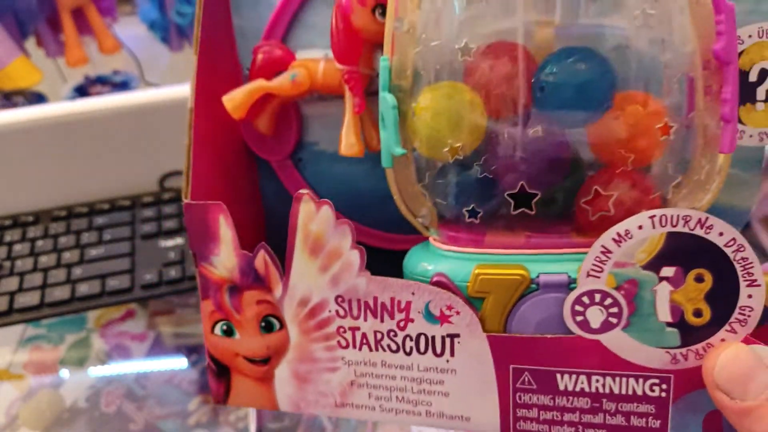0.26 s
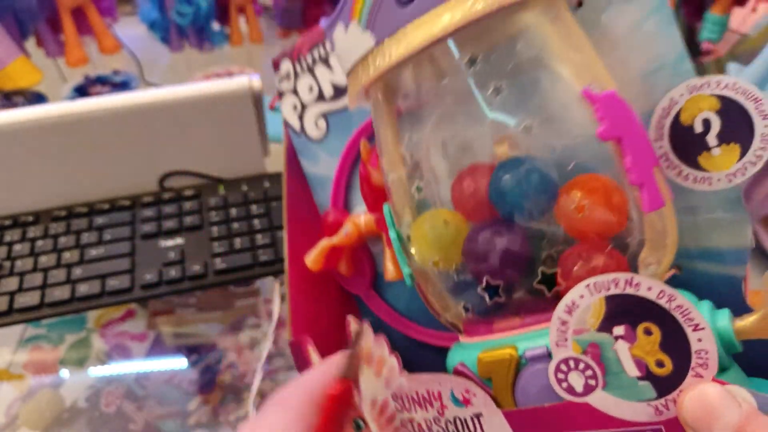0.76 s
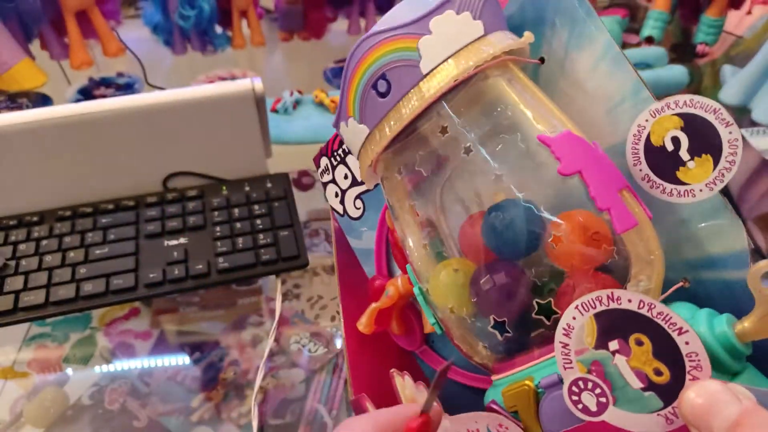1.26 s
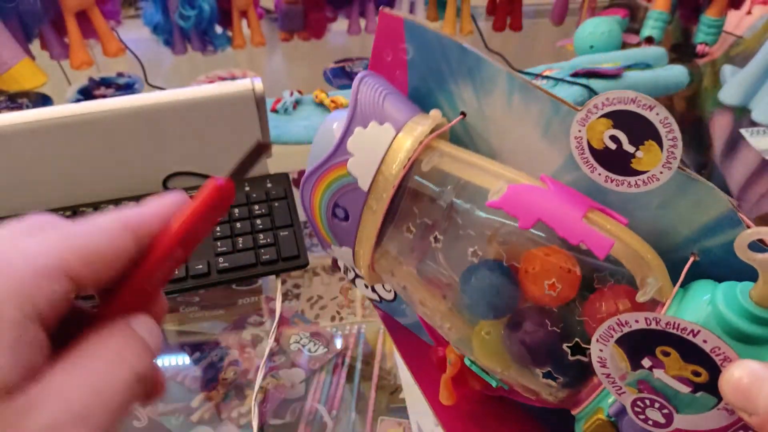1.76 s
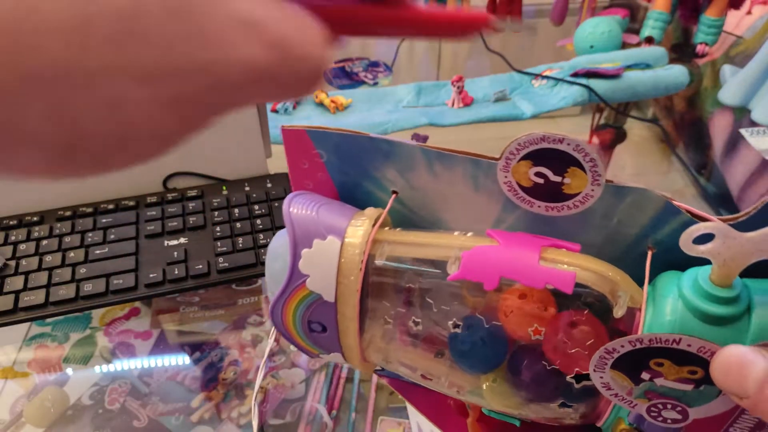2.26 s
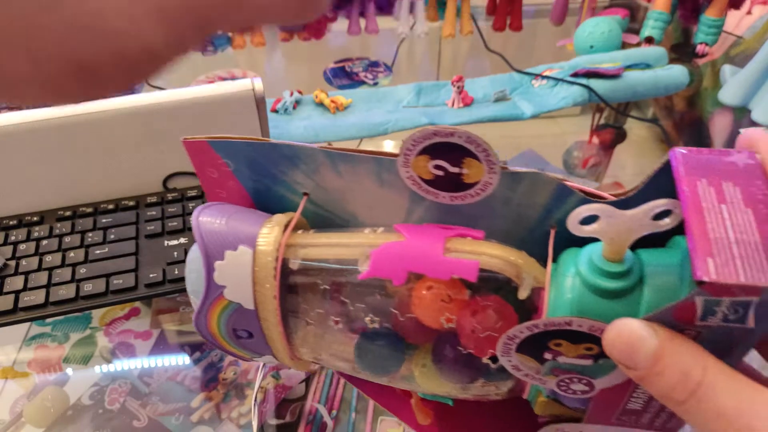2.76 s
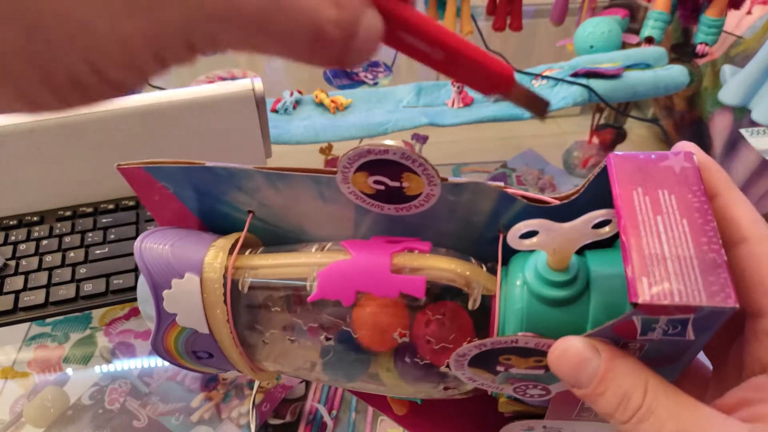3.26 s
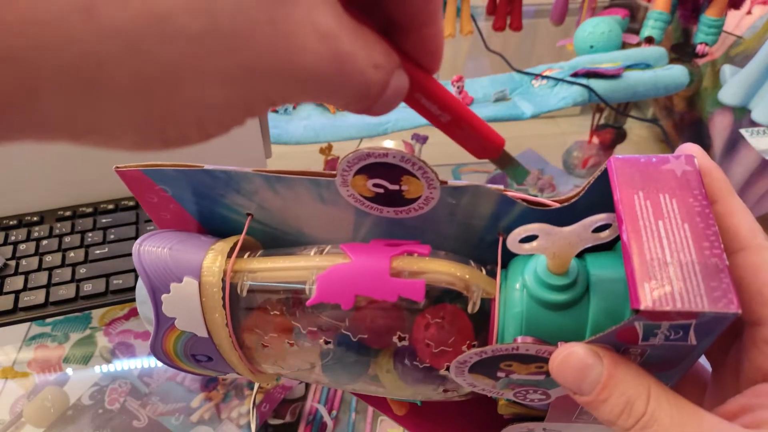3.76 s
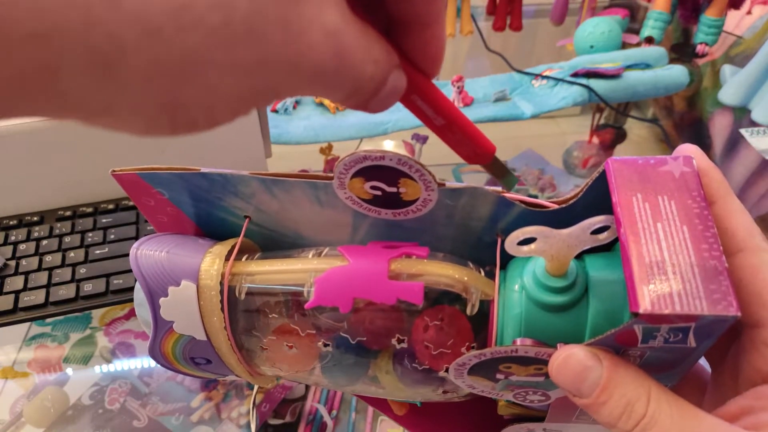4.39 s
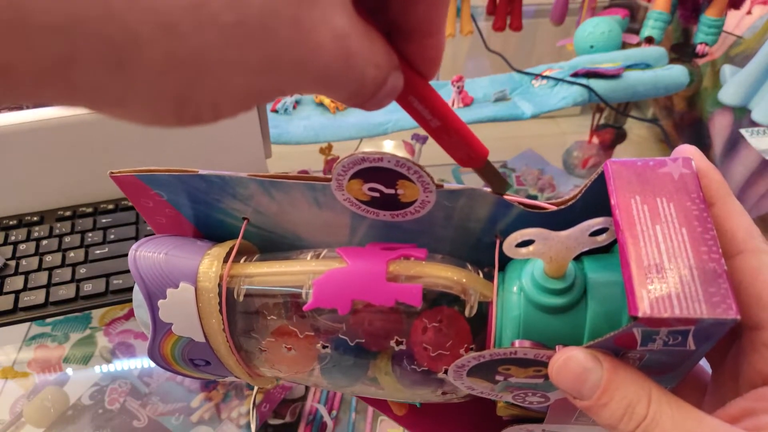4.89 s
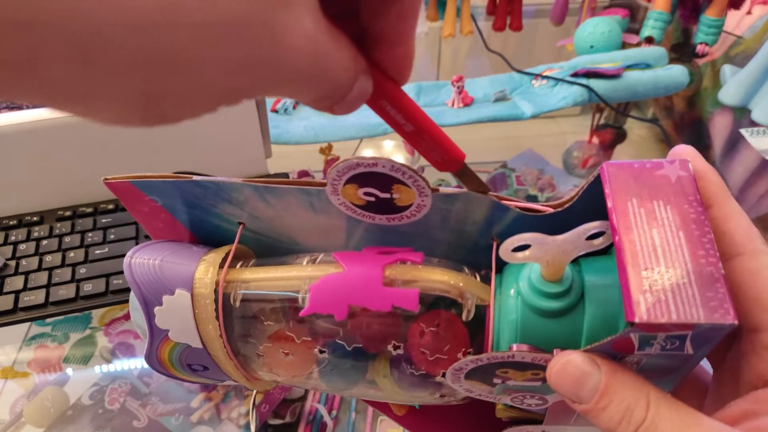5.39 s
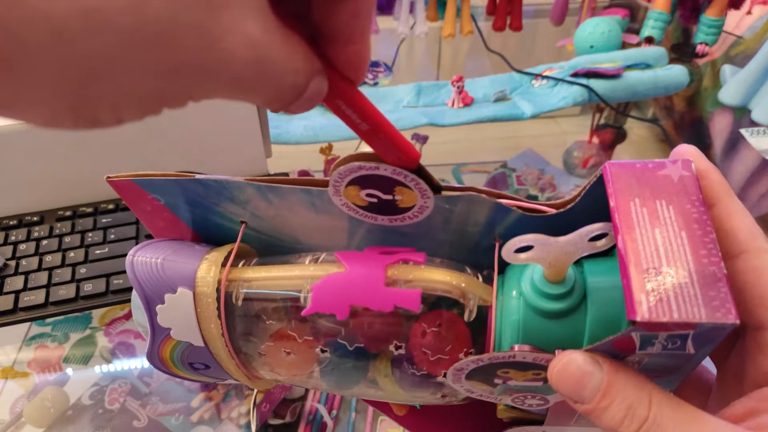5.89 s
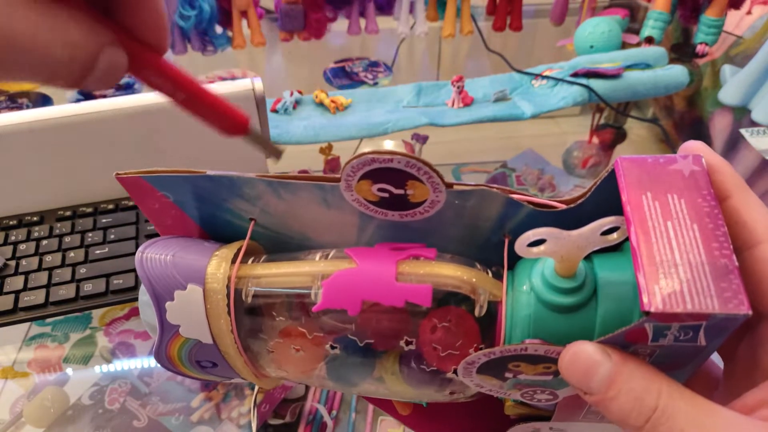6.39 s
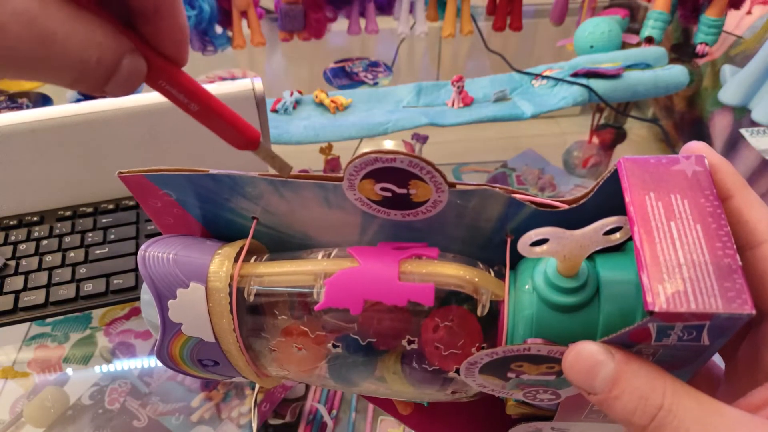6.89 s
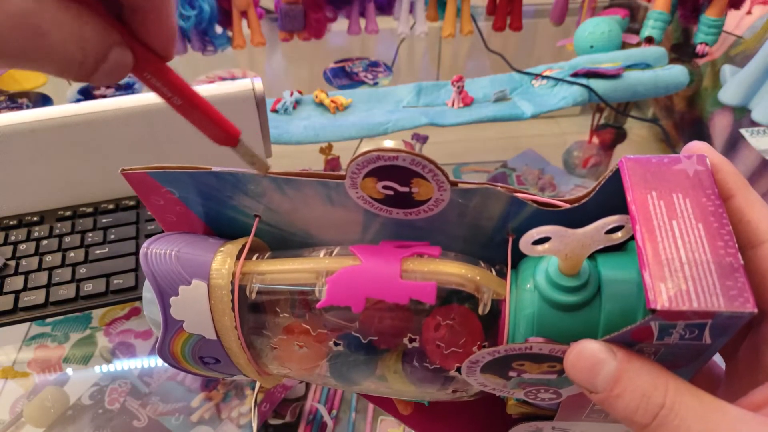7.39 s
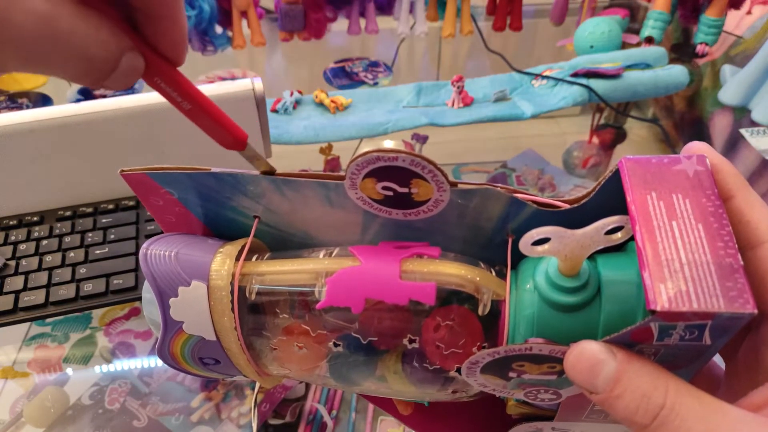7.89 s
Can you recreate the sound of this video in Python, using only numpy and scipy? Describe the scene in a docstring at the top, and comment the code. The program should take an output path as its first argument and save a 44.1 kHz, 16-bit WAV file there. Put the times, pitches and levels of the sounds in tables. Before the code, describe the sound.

A close stereo microphone in a small room hears a boxed plastic toy lantern being handled over soft room air, hand rumble and a faint wavering low hum. At first it is quiet, with a soft bump near 0.4 s and a small click at 0.5. Card bumps dully at 1.1, then hollow balls roll and knock around 1.45-1.65. A sharper card clack and thud come at 2.0, with fingers rubbing the packaging. Balls tumble again from 2.2 to 2.85, with the hardest knock near 2.57, and rattle brightly from 3.4 to 4.0 before settling. Then mostly quiet: faint blade scrapes around 4 s, a short rasp and click at 4.9-5.0, scraping into a strong crisp snap at 5.6. Another snap lands at 6.05, followed by light rubbing, tiny ticks and short scrapes at 7.1 and 7.4, and a bright snap at 7.95 as the hum returns.

```python
"""A boxed plastic toy lantern is turned over in the hands, heard close up in a small room.
Hollow balls roll and knock inside: noise bursts and random slips ring through a plastic wall.
The packaging creaks and bumps: short card bursts, sliding noise and decaying low sines.
Then a craft knife scrapes at the taped cardboard edge (rough slips) and snaps through it.
Room air, hand rumble, a wavering hum and faint drones lie underneath."""
import sys
import numpy as np
from scipy import signal
from scipy.fft import rfft, irfft
from scipy.io import wavfile
from scipy.ndimage import uniform_filter1d

SR = 44100
rng = np.random.default_rng(int(sys.argv[2]) if len(sys.argv) > 2 else 0)


def generate_wav(signal):
    """Clip the signal to [-1, 1] and save it as 16-bit WAV at the path in sys.argv[1]."""
    frames = np.transpose(np.atleast_2d(signal))
    scaled = np.clip(frames, -1, 1) * 32767
    pcm = np.round(scaled).astype(np.int16)
    wavfile.write(sys.argv[1], SR, pcm)


N = 359360

# balls hitting the lantern: start_s, strength_db, brightness_db, cavity_boom_db, struck_spot_hz
KNOCKS = [(.382, -72, -10, 11, 1300), (.604, -59, -10, 3, 3240), (.890, -66, -9, 9, 960),
          (1.417, -57, -12, 0, 2810), (1.4476, -37.5, -8, -6, 1350), (1.5345, -33.5, -7, -4, 1720),
          (1.558, -44, -7, 5, 960), (1.585, -40.5, -10, 5, 1080), (1.601, -49, -4, 1, 960),
          (1.657, -55, -9, 4, 1160), (2.172, -40.5, -3, -2, 1320), (2.278, -59, -3, 11, 960),
          (2.256, -62, -3, 7, 2700), (2.294, -55, -5, -2, 2900), (2.321, -50, -11, -2, 2860),
          (2.384, -54, -1, 5, 2700), (2.435, -47.5, -6, 7, 1150), (2.476, -55, -7, 0, 2700),
          (2.512, -49, -6, 8, 1480), (2.541, -46, -9, 3, 2370), (2.555, -35, -1, -4, 2470),
          (2.5721, -22, 1, -2, 1970), (2.6322, -29.5, 1.5, 0, 2910), (2.654, -45, -6, -4, 3090),
          (2.714, -40.5, 1, 3, 2220), (2.742, -42, -4, -2, 1940), (2.793, -40.5, -4, 1, 1360),
          (2.832, -48, -3, -8, 1540), (3.319, -60, -8, 0, 1350), (3.3755, -31, 0, 5, 3950),
          (3.428, -52, -2, 1, 1990), (3.468, -52, -2, 0, 1040), (3.4835, -40.5, -1, -3, 2110),
          (3.563, -48, -4, 5, 1390), (3.595, -47, -2, 4, 3340), (3.628, -48, -2, 5, 2990),
          (3.649, -41.5, -1, 0, 2950), (3.6745, -31.5, 2, 5, 1030), (3.721, -29.5, 0, -10, 1360),
          (3.730, -35, 4, -2, 3930), (3.756, -45, 1, 3, 3370), (3.815, -45.5, -2, 2, 2330),
          (3.834, -51, -3, -5, 3010), (3.877, -52, -4, -2, 2140), (3.930, -43, 2, -3, 2400),
          (3.964, -53, -5, 1, 2250), (4.043, -42.5, -6, -1, 2210), (4.106, -59, -4, -1, 2210),
          (4.139, -61, -3, -1, 2210)]
# tilts of the box that set the balls rolling: crest_s, rise_s, fall_s, level_db
ROLLS = [(1.53, .3, .24, -60), (2.6, .56, .4, -54.5), (3.66, .36, .35, -51.5)]
# thud, hollow, clack, tick; low bending waves arrive later and last longer: low_hz, high_hz, delay_s,
# added_contact_s (before halving), after_ring_share, after_ring_s, pan_share, left_right_likeness (-1 to 1),
# trim_db (contacts only)
REGISTERS = [(150, 420, .0008, .003, .07, .022, 0, .9, -.3),
             (420, 1150, .0014, .0018, .14, .007, .05, .92, 0),
             (1150, 4500, -.0002, .0006, .13, .0055, .4, .72, 0),
             (4500, 17000, -.0002, .0002, .11, .0026, .95, .7, .3)]
# broad colour of the knocks: pitch_hz, level_db; little is heard above about 10 kHz
KNOCK_COLOUR = [(130, -12), (245, 3), (300, 2), (410, -5), (700, -1), (900, -1.5), (1250, -4), (1600, -1),
                (2100, -1.5), (2600, -5), (3150, -3), (3650, -7), (4700, -7), (7400, -2), (9000, -4),
                (10100, -22), (12500, -29), (15500, -27)]
# resonances of the cardboard: pitch_hz, width_hz, rise_above_colour_db
CARD_PEAKS = [(285, 60, 3), (510, 50, 6), (625, 70, 7), (815, 50, 3), (2350, 90, 4), (3000, 140, 4),
              (6450, 90, 5), (6870, 90, 5), (7233, 90, 5), (7630, 130, 5)]

SIZE = 4096  # samples in a response or contact
HZ = np.fft.rfftfreq(SIZE, 1 / SR)
TIME = np.arange(N) / SR
HUM_ATTACK_S, HUM_RELEASE_S = .1, .45
SOFT_DB = -45  # strength of a soft knock
SWELL_DB = 16  # a roll or rub is this far below its crest one rise before it and one fall after it


def gain_of(db):
    """Turns decibels into an amplitude factor."""
    return 10 ** (np.asarray(db) / 20)


def evened(x):
    """Scales a sound to a mean power of 1."""
    return x / np.sqrt(np.mean(x ** 2) + 1e-30)


def read(points, hz):
    """Joins the points of a curve by straight lines on a log-frequency axis."""
    f, value = np.transpose(points)
    return np.interp(np.log(hz + 1), np.log(f + 1), value)


def level(curve):
    """Turns a dB curve over time into a gain for every sample."""
    return gain_of(np.interp(TIME, *np.transpose(curve)))


def add(mix, s, sound):
    """Lays a sound into the mix at time s, cut at the end."""
    part = mix[:, max(round(s * SR), 0):][:, :sound.shape[1]]
    part += sound[:, :part.shape[1]]


def panned(pair, db):
    """Gives a stereo pair its left-right balance and a mean power of 1."""
    balance = gain_of([[db / 2], [-db / 2]])
    return evened(pair / pair.std(1, keepdims=True) * balance)


def noise_pair(count, likeness):
    """White noise at two ports that are partly alike."""
    a, b = rng.standard_normal((2, count))
    c = np.clip(likeness, -1, 1)
    return np.array([a, c * a + np.sqrt(1 - c * c) * b])


def wander(top_hz):
    """Slow random drift of unit power, holding only rates below top_hz."""
    slow = np.fft.rfftfreq(N, 1 / SR) < top_hz
    return evened(irfft(rfft(rng.standard_normal(N)) * slow, N))


def wash(spectrum):
    """Coloured noise, alike at both ports in the bass and diffuse in the treble."""
    hz = np.fft.rfftfreq(N, 1 / SR)
    alike = np.clip(read([(300, .84), (1500, .65), (5000, .3)], hz), 0, 1)
    a, b = rfft(rng.standard_normal((2, N)))
    pair = np.array([a, alike * a + np.sqrt(1 - alike ** 2) * b])
    return evened(irfft(pair * gain_of(read(spectrum, hz)), N))


def swell(t, crest, rise, fall, db):
    """The gain of a movement that gathers speed up to its crest and slows again."""
    distance = (t - crest) / np.where(t < crest, rise, fall)
    return gain_of(db - SWELL_DB * np.minimum(distance ** 2, 10))


def voiced(voice, strength_db, bright_db):
    """The dB in each register: brightness weighs on each by its own share."""
    return [strength_db + db + share * bright_db for db, share in voice]


def responses(colour, peaks):
    """The causal (minimum-phase) impulse response of a colour with resonances, in each register."""
    db = read(colour, HZ)
    db = db + sum(rise / (1 + ((HZ - f) / (width / 2)) ** 2) for f, width, rise in peaks)
    out = []
    for lo, hi, *_ in REGISTERS:
        band = 1 / np.sqrt((1 + (lo / (HZ + 1)) ** 10) * (1 + (HZ / hi) ** 10))
        log_gain = np.log(gain_of(db) * band + 1e-4)
        circle = np.concatenate([log_gain, log_gain[-2:0:-1]])
        out.append(np.fft.ifft(np.exp(np.conj(signal.hilbert(circle)))).real)
    return out


def hits(table, body, spot_db, spot_width_hz, echo, echo_s, detune, chatter, chatter_s=.004,
         lag_s_per_db=.000015, soft_share=.035, smoothing=.7):
    """Each contact is a brief rough burst that spreads through the body, register by register."""
    out, t = np.zeros((2, N)), np.arange(SIZE) / SR
    bounce = 1 + echo * np.exp(-2j * np.pi * HZ * echo_s)  # off the nearest flap
    to_ten_ms = np.sqrt(.01 * SR / SIZE)  # strength counts as if the power were spread over 10 ms
    lead = .008  # s of soft noise ahead of the hit
    age = np.maximum(t - lead, 0)
    # a faint soft noise swells just before each hit and fades after it
    soft_noise = soft_share * np.exp(-abs(t - lead) / .0022)
    for s, contact, spot_hz, *levels, pan in table:
        # the nearer port hears it first
        lag = np.exp(2j * np.pi * HZ * np.array([[pan / 2], [-pan / 2]]) * lag_s_per_db)
        stretch = 1 + detune * rng.uniform(-1, 1)  # each spot is a little stiffer or softer
        # and has a short ring of its own
        spot = gain_of(spot_db / (1 + ((HZ - spot_hz) / (spot_width_hz / 2)) ** 2))
        # the surfaces touch a second time
        again_s, again = rng.uniform(.5, 1.5) * chatter_s, chatter * rng.random()
        for response, db, register in zip(body, levels, REGISTERS):
            _, _, delay, longer, ring, ring_s, share, alike, trim_db = register
            push_s = max(.5 * (contact + longer), 1e-4)
            u, v = age / push_s, np.maximum(age - again_s, 0) / push_s
            pushes = u ** 1.5 * np.exp(-u) + again * v ** 1.5 * np.exp(-v)
            # after the contact, waves go on crossing the wall
            envelope = soft_noise + pushes + ring * (1 - np.exp(-u)) * np.exp(-age / ring_s)
            wall = np.interp(HZ * stretch, HZ, rfft(response))
            burst = rfft(noise_pair(SIZE, alike) * envelope)
            # a sharp contact excites all pitches about evenly, so the noise's lumps are flattened
            power = np.mean(abs(burst) ** 2, 0)
            lumps = np.sqrt(abs(uniform_filter1d(power, size=50)))
            sound = irfft(burst / lumps ** smoothing * wall * spot * bounce * lag)
            gain = gain_of(db + trim_db) * to_ten_ms
            add(out, s + delay - lead, gain * panned(sound, pan * share))
    return out


def friction(count, response, per_s, spread_db, hiss, slip_s):
    """Short rough slips of uneven size over a smooth hiss, sounding through a body."""
    sizes = gain_of(spread_db * np.minimum(rng.exponential(1, count), 4))
    slips = (rng.random(count) < per_s / SR) * sizes
    u = np.arange(SIZE) / SR / slip_s
    slips = signal.oaconvolve(slips, u * np.exp(-u))[:count]
    drive = noise_pair(count, .7) * (evened(slips) + hiss)
    return evened(signal.oaconvolve(drive, response[None], axes=1)[:, :count])


def background(waver=.35, slip=.6):
    """Steady room air, the rumble of the hands and a wavering low hum that comes and goes."""
    # steady room air: pitch_hz, relative_level_per_hz_db
    air = [(20, -4), (62, 1), (88, -10), (125, -8), (152, -2), (185, -6), (300, -6), (450, -13.5),
           (700, -19.5), (1200, -26), (2500, -32), (5000, -36.5), (7600, -32.5), (9000, -35), (10300, -46),
           (13000, -49), (16000, -61)]
    # rumble of the moving hands: pitch_hz, relative_level_per_hz_db
    grip = [(20, -13), (43, -5), (65, -12), (100, -24), (165, -19), (225, -17), (275, -15), (450, -32),
            (1500, -70)]
    # the hands rumble while they turn the box, settle for the cut and shift again: time_s, level_db
    grip_level = [(0, -62), (2.6, -61.5), (4.1, -66), (4.6, -72), (7.8, -76), (8.15, -64)]
    # spells of the hum: start_s, end_s
    hum_spells = [(1.1, 2.35), (7.93, 8.15)]
    air_db, hum_hz, hum_db, hum_rest_db = -62.8, 62, -61, -78
    phase = 2 * np.pi * hum_hz * TIME + slip * wander(6)
    hum = evened((1 + waver * wander(8)) * np.sin(phase))
    on = 0
    for start, end in hum_spells:
        attack = np.clip((TIME - start) / HUM_ATTACK_S + 1, 0, 1)
        on = on + attack * np.exp(-np.maximum(TIME - end, 0) / HUM_RELEASE_S)
    hum = hum * np.maximum(gain_of(hum_db) * on, gain_of(hum_rest_db))
    return gain_of(air_db) * wash(air) + wash(grip) * level(grip_level) + hum


def drones():
    """Faint steady sines that set in quickly and ramp away slowly."""
    # start_s, end_s, pitch_hz, level_db
    drone_spells = [(0, .8, 43.1, -62), (.3, .7, 198, -68)]
    out = 0
    for start, end, hz, db in drone_spells:
        corners = [start - HUM_ATTACK_S, start, end, end + HUM_RELEASE_S]
        fade = np.interp(TIME, corners, [0, 1, 1, 0])
        out = out + gain_of(db) * fade * evened(np.sin(2 * np.pi * hz * TIME))
    return out


def snap(s, strength_db, bright_db, thump_db, crack_hz, pan_db):
    """The quicker the card gives way, the brighter it sounds."""
    # a snap in the four registers: level_above_strength_db, brightness_share
    snap_voice = [(-7.5, -.9), (-4.5, -.7), (-4.5, 0), (3, 1)]
    # card braced against the box thumps, a loose flap clacks: thump_share in each register
    thump_shares = [1.1, .3, -.55, .15]
    levels = np.add(voiced(snap_voice, strength_db, bright_db), thump_db * np.array(thump_shares))
    contact = .0013 / 2 ** (bright_db / 12)  # s; each 12 dB of brightness halves it
    return s, contact, crack_hz, *levels, pan_db


def card_snaps(card):
    """Card, tape and blade snap: brief bursts ringing through the cardboard."""
    # start_s, strength_db, brightness_db, box_thump_db, crack_hz, left_right_db
    snap_events = [(.097, -67, -5, -6, 3700, 0), (.5204, -52, 14.5, -2, 8300, -2),
                   (.545, -62, 8, -7, 7700, -5), (.830, -56, 7, 5, 8900, 6), (1.0954, -45, -2, 0, 7400, -6),
                   (1.103, -46, -4, 3, 7200, -2), (1.1385, -55, -6, 0, 7400, -6),
                   (1.2635, -59, 7, 4, 8800, 1), (1.386, -59, 5, 0, 7600, -6),
                   (1.690, -60, 0, -3, 7900, -3), (1.866, -62, 5, -3, 8100, -5),
                   (1.897, -57, 5, -4, 6500, -8), (1.9954, -37, -5, -5, 7800, -4),
                   (2.000, -35, -4, -3, 7900, -4), (2.007, -34, -4, -1, 7700, -2),
                   (2.023, -46, -7, 5, 7000, -4), (2.046, -51, 4, 5, 7500, -14),
                   (2.8455, -40.5, 9, -7, 8500, 2), (2.8616, -45, 6, -4, 8500, 2),
                   (2.911, -44, 8, -9, 8200, 1), (3.529, -43, 6, -4, 8200, -1),
                   (3.669, -44, 2, -2, 7200, -6), (3.709, -45, 4, 1, 7600, -6),
                   (4.488, -61, 5, -2, 7600, -10), (4.775, -60, -3, -3, 7300, -6),
                   (4.804, -58, -9, -7, 3500, -7), (5.030, -48, 0, -1, 7200, -10),
                   (5.036, -51, -4, 1, 7200, -9), (5.245, -67, -6, -4, 7300, -8),
                   (5.299, -62, -6, -2, 8100, -9), (5.492, -50, -2, -5, 7100, -9),
                   (5.595, -31, 1, -1, 7200, -9), (5.608, -33.5, 5.5, 1, 7000, -9),
                   (5.6115, -37, 2, 3, 7600, -10), (6.046, -40, 3, 6, 7800, -11),
                   (6.105, -49, 3, -1, 7400, -13), (6.178, -56, -7, 0, 7100, -6),
                   (6.8035, -55, -1, 0, 7400, -13), (6.828, -54, 5, 0, 7600, -14),
                   (7.089, -60, 0, 4, 6900, -15), (7.185, -60, 0, -2, 5400, -10),
                   (7.481, -51, 0, 0, 8000, -8), (7.9463, -40, 7.5, 4, 7600, -13)]
    return hits([snap(*row) for row in snap_events], card, spot_db=8, spot_width_hz=1700,
                echo=.18, echo_s=.0014, detune=.004, chatter=.35)


def knock(s, strength_db, bright_db, boom_db, spot_hz):
    """A ball's contact with the wall shortens with the fifth root of its speed."""
    speed = gain_of(max(strength_db - SOFT_DB, 0))
    contact = .0018 / speed ** .2  # s
    thud_db = -15 + .6 * boom_db  # the low thud takes a share of the boom
    levels = strength_db + np.array([thud_db, boom_db, 0, bright_db])
    return s, contact, spot_hz, *levels, -3.5  # left_right_db: the lantern lies a little to the right


def taps(count=2, scatter=.3, boom_db=3, low_hz=1000, high_hz=3400):
    """Rolling balls tap each other at random, harder the faster they roll."""
    tap_db, tap_spread_db, bright_db = -3, 1.5, -4  # strength is relative to the rolling
    rows = []
    for crest, rise, fall, db in ROLLS:
        offsets = scatter * rng.uniform(-2, 2, count)
        sizes, spots_hz = rng.standard_normal(count), rng.uniform(low_hz, high_hz, count)
        for when, size, spot_hz in zip(offsets, sizes, spots_hz):
            s = crest + when * (rise if when < 0 else fall)
            rolling_db = 20 * np.log10(swell(s, crest, rise, fall, db))
            rows.append((s, rolling_db + tap_db + tap_spread_db * size, bright_db, boom_db, spot_hz))
    return rows


def ball_knocks(lantern):
    """Balls hit the lantern and each other: bursts ringing through the plastic wall."""
    return hits([knock(*row) for row in KNOCKS + taps()], lantern, spot_db=7.5, spot_width_hz=550,
                echo=.15, echo_s=.0016, detune=.035, chatter=.7)


def rattle():
    """After each knock the ball chatters against the wall, ever more weakly."""
    # resonances of a hollow ball: pitch_hz, width_hz, rise_above_colour_db
    ball_peaks = [(1300, 130, 6), (2200, 160, 7), (2870, 240, 12)]
    soft_rattle_db, gain_per_db, fading_s = -60.5, .6, .03
    kicks = np.zeros((1, N))
    for s, db, *_ in KNOCKS:
        kick = gain_of(soft_rattle_db + gain_per_db * (db - SOFT_DB)) ** 2
        add(kicks, s + .008, np.full((1, 1), kick))
    energy = signal.lfilter([1], [1, -np.exp(-2 / (fading_s * SR))], kicks + 1e-20)
    clack = responses(KNOCK_COLOUR, ball_peaks)[2]
    return np.sqrt(energy) * friction(N, clack, per_s=230, spread_db=2.2, hiss=.2, slip_s=.0005)


def bumps(rise_s=.003):
    """The box bumps the hand: a soft push excites its slow flexing, mostly near the favoured pitch."""
    # start_s, level_db, favoured_hz
    pushes = [(.382, -41, 350), (.451, -53, 340), (.831, -53, 290), (.89, -52, 330), (1.097, -43, 500),
              (1.106, -39, 148), (1.15, -51, 155), (2.01, -39, 190), (2.035, -39, 150), (5.612, -46, 250),
              (6.053, -54, 290)]
    # flexing of the box: pitch_hz, level_db, t60_s
    box_modes = [(125, -5, .15), (152, 0, .2), (176, -5, .15), (238, -1, .14), (283, -2, .14),
                 (335, 0, .11), (395, -2, .07), (495, 0, .09)]
    out, t = np.zeros((2, N)), np.arange(SR // 3) / SR
    for s, peak_db, push_hz in pushes:
        ring = 0
        for hz, db, t60 in box_modes:
            away_db = 20 * abs(np.log2(hz / push_hz))
            ring = ring + gain_of(db - away_db - 60 * t / t60) * np.sin(2 * np.pi * hz * t)
        push = ring / abs(ring).max() * (1 - np.exp(-t / rise_s))
        add(out, s, gain_of(peak_db) * np.tile(push, (2, 1)))
    return out


def handling(lantern, card, roll_clack_db=-7, rub_clack_db=-9, catch_db=3.5, grip_db=2):
    """Balls rumble over the lantern wall while fingers catch and slide on the card."""
    # fingers sliding on the packaging: crest_s, rise_s, fall_s, level_db
    rubs = [(1.15, .04, .09, -65), (1.5, .25, .15, -65), (1.92, .3, .2, -60), (2.24, .1, .25, -59),
            (2.72, .25, .35, -60), (3.65, .3, .4, -68), (6.15, .25, .3, -73), (7.22, .2, .2, -73),
            (8.15, .4, .3, -77)]
    rub_rest_db = -88  # resting fingers still stir a little
    roll = friction(N, lantern[1], per_s=150, spread_db=3, hiss=.3, slip_s=.001)
    roll_clack = friction(N, lantern[2], per_s=140, spread_db=3, hiss=.4, slip_s=.001)
    roll += gain_of(roll_clack_db) * roll_clack
    rub = friction(N, card[3], per_s=160, spread_db=2.8, hiss=1.2, slip_s=.0012)
    rub_clack = friction(N, card[2], per_s=150, spread_db=2.5, hiss=.8, slip_s=.001)
    rub += gain_of(rub_clack_db) * rub_clack
    roll = evened(roll * gain_of(catch_db * wander(45)))
    # the grip tightens and eases
    rub = evened(rub * gain_of(.4 * catch_db * wander(30) + grip_db * wander(9)))
    roll_gain = sum(swell(TIME, *row) for row in ROLLS)
    rub_gain = gain_of(rub_rest_db) + sum(swell(TIME, *row) for row in rubs)
    return roll * roll_gain + rub * rub_gain


def blade(edge_db=6, stick_db=1.4):
    """Each stroke builds as the blade bites into the fibres, then lets go quickly."""
    # blade strokes: start_s, length_s, strength_db, brightness_db, torn_fibre_rasp_db
    strokes = [(3.98, .15, -66, -1, 7), (4.22, .05, -63, 4, 0), (4.933, .044, -49.5, -1, 0),
               (5.012, .018, -57, -1, 0), (5.41, .13, -64, -4, -6), (5.495, .014, -52, -3, 5),
               (5.555, .04, -53, 4, -4), (5.98, .06, -63, 3, -2), (7.058, .05, -66, -8, -9),
               (7.136, .055, -60, -5, -7), (7.426, .066, -53.5, -3, -6)]
    # a stroke in the four registers: level_above_strength_db, brightness_share
    scrape_voice = [(-8, -1), (0, -1), (-4.5, 0), (0, 1)]
    # broad colour of the scrapes: pitch_hz, level_db; little is heard above about 10 kHz
    scrape_colour = [(300, -16), (480, -5), (630, 3), (900, -5), (1200, -6), (2500, -8), (4500, -11),
                     (7400, -2), (9000, -5), (10400, -19), (15500, -27)]
    bite_share, pan_db = .75, -7  # share of a stroke before the hardest bite; left-right balance
    scrape_body = responses(scrape_colour, CARD_PEAKS)
    out, catching = np.zeros((2, N)), wander(130)
    for start, length, strength_db, bright_db, rasp_db in strokes:
        t = np.arange(0, max(length, .01), 1 / SR)
        pressure = gain_of(np.interp(t / length, [0, bite_share, 1], [-edge_db, 0, -edge_db]))
        pressure = pressure * signal.windows.tukey(len(t), .15)
        stick = gain_of(stick_db * np.interp(start + t, TIME, catching))  # the blade catches and slips
        levels = np.add(voiced(scrape_voice, strength_db, bright_db), [0, 0, rasp_db, 0])
        for response, db, (*_, share, _, _) in zip(scrape_body, levels, REGISTERS):
            grain = friction(SR // 2, response, per_s=900, spread_db=1.7, hiss=.6, slip_s=.0003)
            grain = stick * grain[:, -len(t):]
            add(out, start, gain_of(db) * pressure * panned(grain, pan_db * share))
    return out


def reflections(first_s=.004, bass_likeness=.8):
    """Dense reflections from desk and walls, each band dying at its own speed."""
    # room decay: pitch_hz, t60_s
    room_t60 = [(150, .38), (500, .3), (1200, .32), (3000, .29), (8000, .21), (15000, .18)]
    # strength of the reflections: pitch_hz, level_db
    room_colour = [(150, -8), (600, -12), (2000, -10.5), (5000, -10.5), (8000, -12), (15000, -13.5)]
    hz, t, z = signal.stft(rng.standard_normal((2, SR // 2)), SR, nperseg=256)
    alike = np.clip(read([(500, bass_likeness), (2000, .1)], hz), 0, 1)[:, None]
    z[1] = alike * z[0] + np.sqrt(1 - alike ** 2) * z[1]
    t60 = read(room_t60, hz)[:, None]
    decay = gain_of(read(room_colour, hz)[:, None] - 60 * t / t60)
    shape = decay * np.sqrt(2 * np.log(1000) / (t60 * SR))  # evens the energy of long and short decays
    tail = signal.istft(z * shape, SR, nperseg=256)[1]
    return np.pad(tail, ((0, 0), (round(first_s * SR), 0)))


def room(x, cycle_hz=1.7):
    """Two noise-built reverb tails trade in a steady cycle, which keeps the decay even."""
    angle = 2 * np.pi * cycle_hz * TIME
    shares = (np.cos(angle), np.sin(angle))
    return sum(signal.oaconvolve(x * share, reflections(), axes=1)[:, :N] for share in shares)


def scene(snap_room_db=-1):
    """Snaps, knocks, blade and handling sound together in the small room."""
    # resonances of the plastic lantern: pitch_hz, width_hz, rise_above_colour_db
    lantern_peaks = [(302, 45, 4), (505, 40, 4), (593, 65, 11), (815, 30, 5), (1055, 45, 6), (1335, 80, 3),
                     (1880, 70, 5), (2070, 50, 4), (2180, 50, 5), (2890, 160, 2)]
    # broad colour of the snaps: pitch_hz, level_db; little is heard above about 10 kHz
    snap_colour = [(130, -4), (250, 5), (400, 1), (620, 1), (1000, -3), (1300, 2), (2600, -4), (3200, -2),
                   (3700, -4), (4700, -11), (5700, -4), (6600, -1), (7600, 0), (9100, -1), (10200, -18),
                   (12500, -27), (15500, -26)]
    lantern, card = responses(KNOCK_COLOUR, lantern_peaks), responses(snap_colour, CARD_PEAKS)
    snaps = card_snaps(card)
    rest = ball_knocks(lantern) + rattle() + bumps() + handling(lantern, card) + blade()
    # the snaps are on the near side of the box, so drier
    echoes = room(rest + gain_of(snap_room_db) * snaps)
    return snaps + rest + echoes + background() + drones()


def record(dry):
    """The two microphone ports differ in colour; then a steep low-pass limits the band."""
    # pitch_hz, left_right_db
    port_colour = [(30, 5), (250, 3.4), (600, 1.5), (2000, .5), (4000, -2), (6000, -3), (7300, -6),
                   (8200, 1), (9000, 8), (10000, 3), (12000, 0)]
    difference_db = read(port_colour, np.fft.rfftfreq(N, 1 / SR))
    tilt = gain_of(difference_db * np.array([[.5], [-.5]]))
    heard = irfft(rfft(dry) * tilt / np.sqrt(np.mean(tilt ** 2, 0)), N)
    low_pass = signal.firwin(255, 15900, window=("kaiser", 9), fs=SR)
    return signal.oaconvolve(heard, low_pass[None], "same")


dry = scene()
out = record(dry)
generate_wav(out)
```